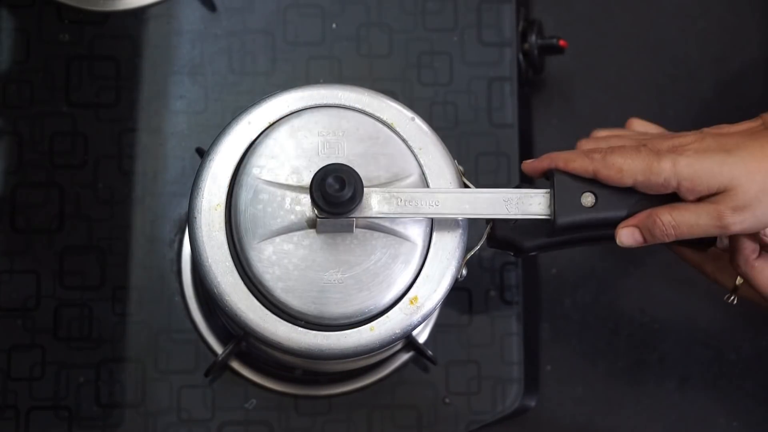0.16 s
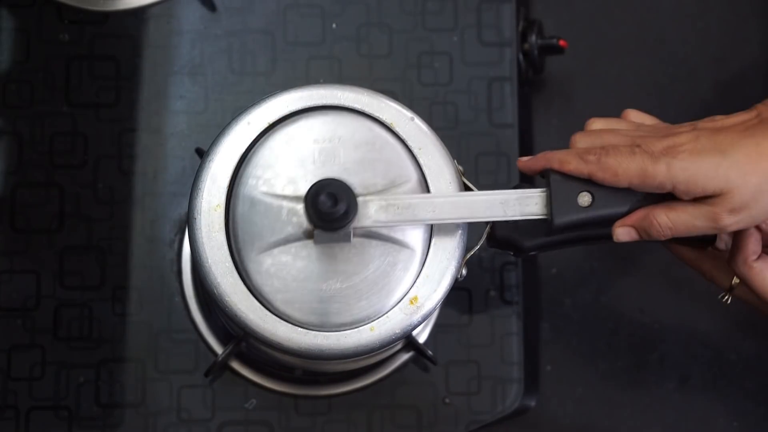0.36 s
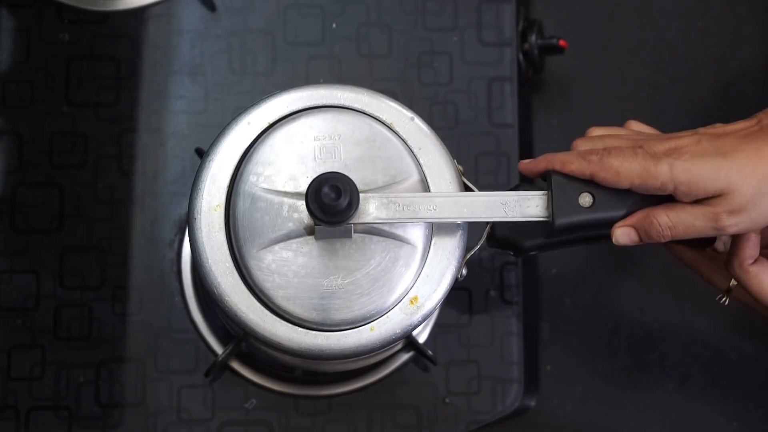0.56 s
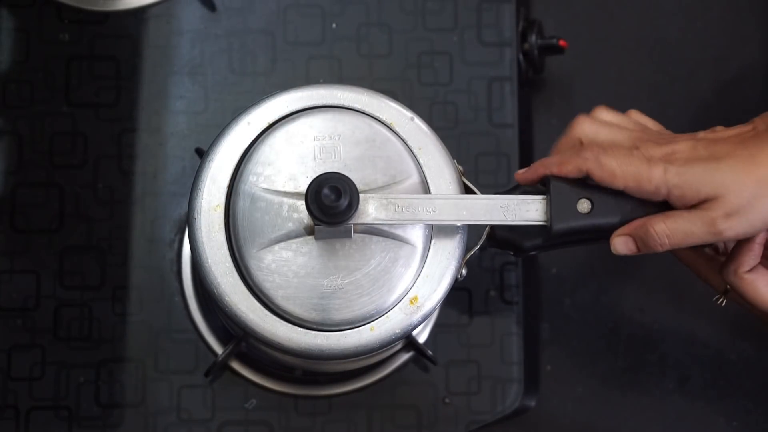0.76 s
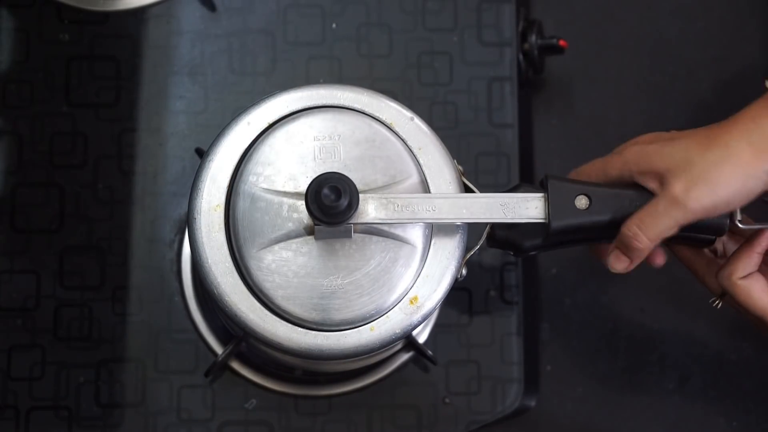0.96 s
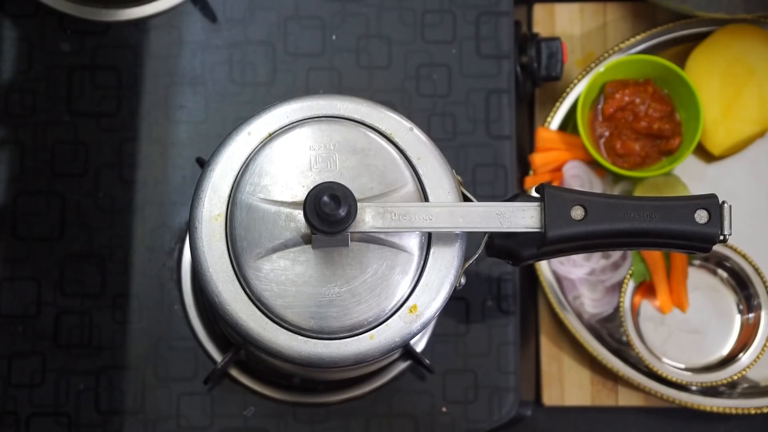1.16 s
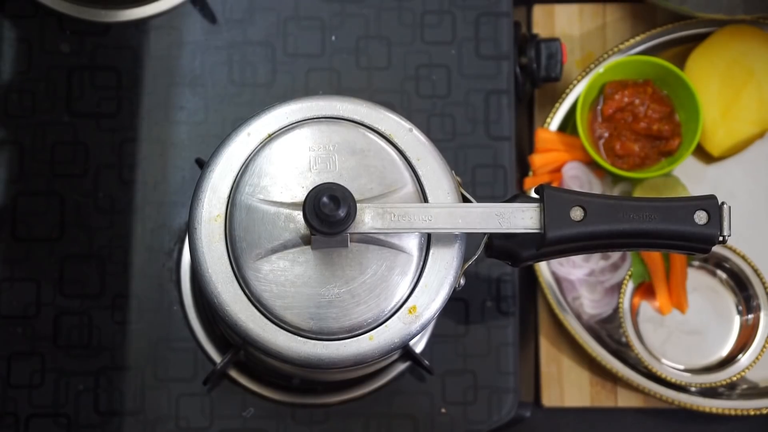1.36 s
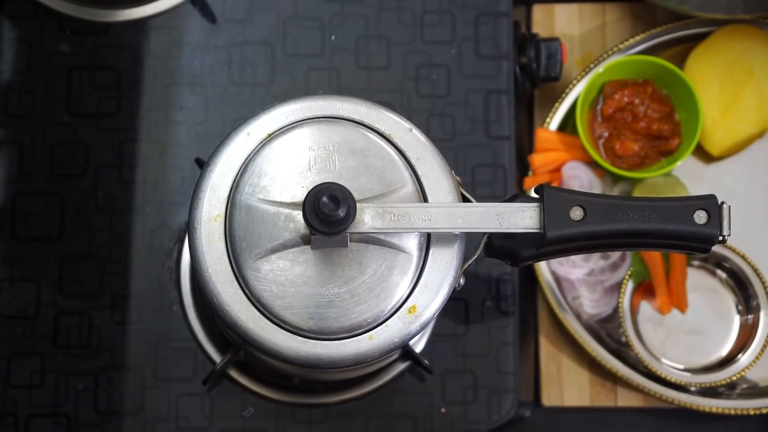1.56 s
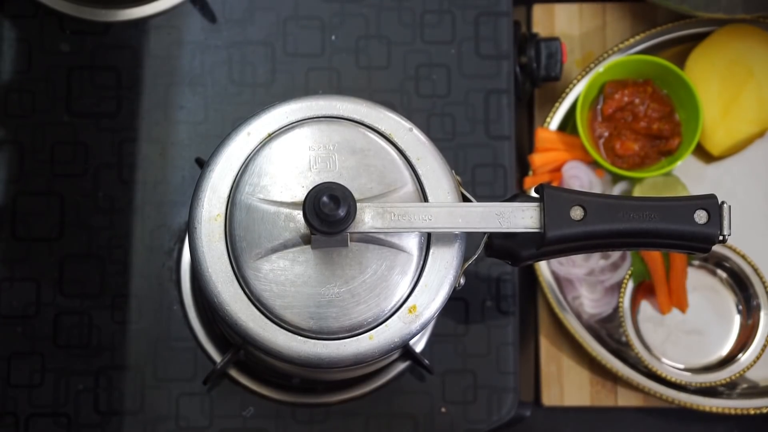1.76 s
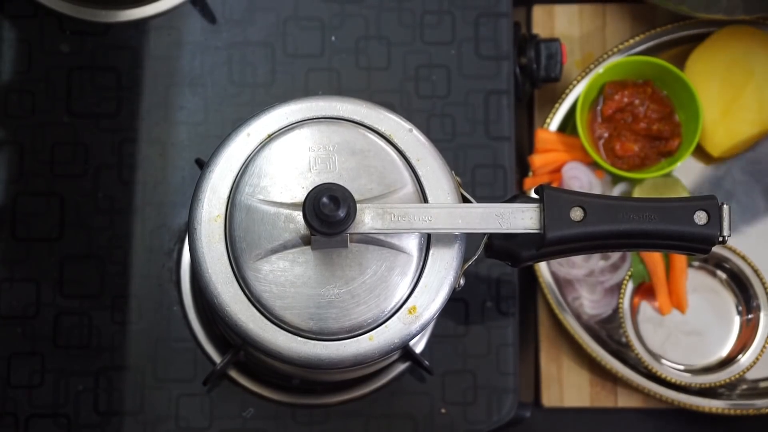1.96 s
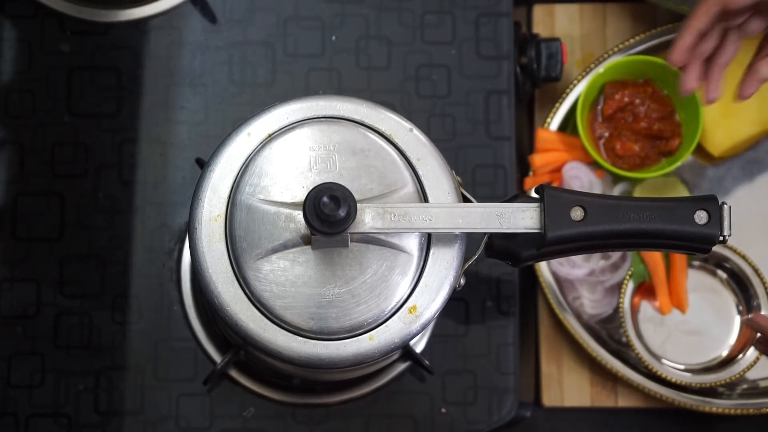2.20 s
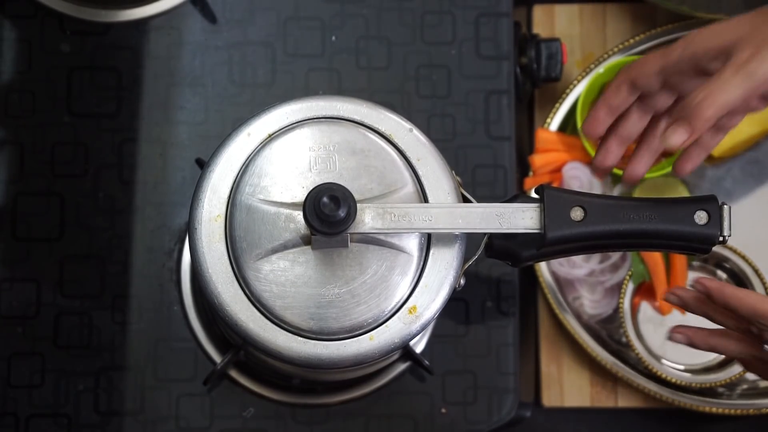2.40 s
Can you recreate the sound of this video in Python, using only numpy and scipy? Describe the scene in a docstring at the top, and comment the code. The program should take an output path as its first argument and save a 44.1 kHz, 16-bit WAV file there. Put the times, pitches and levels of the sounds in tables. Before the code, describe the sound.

A metal pressure cooker lid knocks and scrapes into place, its catch snaps with a bright ring and rattles, then sound cuts abruptly to quiet kitchen hiss and faint dish clinks; close stereo pickup, reflective room.

```python
"""In a hard-walled kitchen, the lid of a metal pressure cooker is seated and locked.
Short pushes filtered by the metal make lid bumps; added noisy slides make rim scrapes and catch snaps.
Decaying sine waves make pot, rim and catch ring. During a last rattle all sound is cut off abruptly.
Then the kitchen fades back in: filtered noise for hiss and rumble, sine waves for hum, and faint dish clinks.
"""
import sys
import numpy as np
from scipy import signal
from scipy.fft import rfft, irfft, next_fast_len
from scipy.io import wavfile

SR = 44100
rng = np.random.default_rng(int(sys.argv[2]) if len(sys.argv) > 2 else 0)


def wav_record(signal):
    """Record a signal, one row per channel, as 16-bit PCM in the file named by sys.argv[1]."""
    frames = np.transpose(np.atleast_2d(signal))
    bounded = np.clip(frames, -1, 1)
    # unit amplitude maps onto the largest positive 16-bit level
    quanta = np.round(bounded * 32767).astype(np.int16)
    wavfile.write(sys.argv[1], SR, quanta)


N = 107339
TIME = np.arange(N) / SR  # seconds

# Event levels are set at the source, before filters, room and fades.
# Colours and ringing notes have levels relative to the others in their own table.

# Colour of the soft background hiss: (frequency [Hz], relative level [dB])
HISS_COLOUR = [(25, -11.5), (60, -6), (125, -7), (170, -0.5), (240, -2), (330, -3), (450, -2), (750, -4),
               (1100, -5), (1500, -7.5), (2200, -14), (3200, -17.5), (4500, -23), (6500, -29.5),
               (9000, -31), (12000, -35.5), (16000, -37)]
# Steady hum of a motor:
# (frequency [Hz], level before the sound cuts off [dB], level after it fades back in [dB])
MOTOR_HUM = [(44.8, -65, -67), (70.7, -54, -59), (97.26, -43, -47.5), (251, -57.5, -56), (355, -63, -59.5),
             (842, -56, -57.5)]
# Changing loudness of the low rumble: (time [s], level [dB])
RUMBLE_LEVEL = [(0, -54), (1.45, -76.5), (1.62, -48), (1.72, -47), (1.82, -66), (2.0, -51), (2.12, -48.5),
                (2.25, -52), (2.43, -61)]
# Faint clinks of dishes: (time [s], level [dB], pitch [Hz])
DISH_CLINKS = [(1.372, -19, 4200), (1.494, -21, 4400)]

# How long the room's echo takes to fall by 60 dB: (frequency [Hz], time [s])
ROOM_DECAY = [(100, 0.28), (400, 0.64), (1500, 0.8), (4500, 0.69), (8000, 0.58), (15000, .42)]
# Strength of the room's echo compared with the direct sound: (frequency [Hz], level [dB])
ROOM_ECHO = [(100, -6), (300, 4), (1000, 7), (3000, 7), (12000, 8)]
# How alike left and right are in hiss and echo: (frequency [Hz], likeness [-1 to 1])
LEFT_RIGHT_LIKENESS = [(60, 0.89), (180, 0.95), (350, 0.86), (700, 0.74), (1400, 0.55), (2800, 0.42),
                       (5600, 0.033), (14000, 0.047)]

# The lid bumps on its gasket: (time [s], level [dB], brightness limit [Hz])
LID_BUMPS = [(.006, 1, 2200), (.117, 7.5, 603), (0.1317, 9, 497), (0.1483, -5, 396), (0.379, -1, 1550),
             (.389, 7, 1800), (0.3966, 14.5, 1940), (0.406, -1.5, 720), (0.446, -1, 1470), (.588, 12, 398),
             (0.5996, 1.5, 2530), (0.655, -8.5, 444), (0.73, -1, 610), (0.762, -9, 397), (0.804, -8, 3000),
             (.915, -2.5, 450)]
# The rim strikes the pot and slides on: (time [s], level [dB], slide decay [s], brightness limit [Hz])
RIM_STRIKES = [(.005, 9.5, 0.028, 4480), (.018, 5, 0.018, 6250), (.0245, 13, 0.0066, 9000),
               (.056, 6.5, 0.012, 7700), (.1265, 7.5, 0.002, 9300), (.1615, -6.5, 0.0038, 8330),
               (.4108, 10.5, 0.0082, 4300), (.426, 12, 0.0083, 10200), (.433, 12, 0.0097, 10400),
               (.4395, 8.5, 0.019, 11400), (.466, 8.5, 0.018, 8100), (.5995, 9, 0.0057, 6500),
               (.6454, -7, 0.0018, 7120)]
# The wire catch rubs, snaps home and settles:
# (time [s], level [dB], slide decay [s], brightness limit [Hz])
CATCH_SNAPS = [(.806, 4.5, 0.0027, 1900), (.8165, 13.5, 0.0019, 13400), (.8195, 11.5, 0.0031, 4460),
               (.835, 7, 0.031, 9040), (.9707, -1.5, 0.0024, 15320)]
# The loose catch rattles on the handle: (time [s], level [dB], slide decay [s], brightness limit [Hz])
CATCH_RATTLES = [(1.1778, -3.5, 0.0036, 8100), (1.188, 1.5, 0.0043, 15400), (1.197, -6.5, 0.0096, 14000)]
# Dry, hard edges of the sharpest contacts:
# (time [s], level [dB], decay [s], lowest frequency [Hz], highest frequency [Hz])
SHARP_CRACKS = [(0.598, -3.5, 0.0032, 1220, 2130), (0.812, -9, 0.00088, 2960, 13750),
                (1.189, -9.5, 0.0027, 697, 15100)]

# Colour of the lid dragging on rubber: (frequency [Hz], relative level [dB])
RUBBER_COLOUR = [(40, -44), (120, -27.5), (270, -11), (340, -11), (460, -4), (620, -7.5), (850, -17),
                 (1450, -7.5), (2000, -20.5), (4000, -16)]
# Colour of the cushioned bumps in the pot: (frequency [Hz], relative level [dB])
BUMP_BODY_COLOUR = [(30, -40.5), (120, -17), (180, -6), (230, 2), (280, 0), (380, -7), (700, -13),
                    (960, -8.5), (1130, -14.5), (1400, -1.5), (1750, -9.5), (2200, -19.5), (5000, -8.5),
                    (12000, -55)]
# Colour of the rim against the pot: (frequency [Hz], relative level [dB])
RIM_BODY_COLOUR = [(50, -29.5), (400, -2), (1000, -4.5), (1450, -1.5), (1900, -11.5), (2200, -4.5),
                   (2700, -0.5), (3400, -5.5), (4400, -0.5), (4900, 6.5), (5400, 5), (6100, -8.5),
                   (7000, -0.5), (7550, 2), (8400, -7.5), (12000, -10.5), (16000, -18.5)]
# Colour of the wire catch: (frequency [Hz], relative level [dB])
CATCH_BODY_COLOUR = [(50, -45.5), (250, -13.5), (500, -11), (800, -10.5), (1050, -15.5), (1400, -4),
                     (1750, -19), (2050, -3.5), (2450, 3), (2750, 6), (3050, -2), (3450, -12), (4400, -5),
                     (5400, -6), (7500, -12.5), (10000, -15), (14000, -18), (16000, -37.5)]
# Colour of the rattling catch: (frequency [Hz], relative level [dB])
RATTLE_BODY_COLOUR = [(100, -5), (700, -6.5), (1500, -9.5), (3600, -9.5), (5100, -0.5), (6800, -12),
                      (11000, -6.5), (16000, -10.5)]

# Ringing notes of the pot: (frequency [Hz], relative level [dB], time to fall by 60 dB [s])
POT_NOTES = [(171.2, -8, 0.46), (241.8, -5.5, 0.97), (284.6, -4, 0.32), (375, -8.5, 0.72),
             (427, -3.5, 0.73), (461, -15, 0.44), (596, -13, 0.76), (1086, -9.5, 0.81), (1371, -17, 0.55),
             (1507, -13, 0.31)]
# Ringing notes of the rim: (frequency [Hz], relative level [dB], time to fall by 60 dB [s])
RIM_NOTES = [(1920, -20, 0.55), (2616, -2.5, 0.47), (4107, -8, .5), (4468, -14, 0.6), (4500, 11, 0.36),
             (4930, 2.5, 0.45), (5130, -12, 0.42), (5070, -4.5, 0.76), (5440, -5, 0.39), (5300, 6.5, 0.54),
             (5500, -18.5, 0.41), (7340, 1, 0.15)]
# Ringing notes of the catch: (frequency [Hz], relative level [dB], time to fall by 60 dB [s])
CATCH_NOTES = [(1450, -24, 0.96), (2200, 5, 0.58), (2200, 12, .6), (2550, -12, 0.86), (2640, -8, 1),
               (2700, -11, 0.85), (2930, -4, 0.4), (2840, -9, 0.65), (5200, 19.5, 0.616)]

HISS_BEFORE_DB, HISS_AFTER_DB = -41.5, -43
CUT_S, CUT_DECAY_S = 1.2065, .0025  # all sound is cut off abruptly
FADE_START_S, FADE_S, FADE_POWER = 1.202, 0.21, 1.65  # the kitchen fades back in
EARLY_DB, EARLY_DECAY_S, FIRST_ECHO_S = -6, .008, 0.0013
DRAG_S, DRAG_DECAY_S, DRAG_DB = .002, 0.035, 19
SLIPS_PER_S, SLIDE_SHARE = 4300, 0.82  # slide's share of the energy; the click has the rest
POT_RING_DB, RIM_RING_DB, CATCH_RING_DB = -5.5, -8.5, -9
RING_DIFFUSE_HZ = 2980  # the left-right phase spread of ringing is full from here up
BEND_DELAY_S, BEND_REF_HZ = 0.001106, 981  # travel time in the metal at this frequency
PAN_DB = .45  # left is raised and right lowered by this much
CUTOFF_HZ = 15800


def from_db(db):
    """Turn decibels into a gain."""
    return 10 ** (np.asarray(db) / 20)


def unit(x):
    """Scale a sound to an energy of one."""
    return x / np.sqrt(np.sum(x ** 2) + 1e-20)


def at_hz(points, hz):
    """Read a table between its points, on a logarithmic frequency axis."""
    table_hz, values = np.transpose(points)
    return np.interp(np.log(np.maximum(hz, 1)), np.log(table_hz), values)


def through(x, response):
    """Let a sound or force set off a response at every sample."""
    return signal.fftconvolve(x, response)[:N]


def knock(colour, size=2048):
    """A body's short response to one push, with its energy as early as the colour allows."""
    gain = from_db(at_hz(colour, np.fft.rfftfreq(size, 1 / SR)))
    cepstrum = irfft(np.log(gain))
    # Folding the second half onto the first makes the response start at once.
    cepstrum[1:size // 2] *= 2
    cepstrum[size // 2 + 1:] = 0
    return unit(irfft(np.exp(rfft(cepstrum))))


def add(track, time_s, db, force, bright_hz):
    """Lay a force on a track; a lower brightness limit softens its treble."""
    soften = signal.butter(2, bright_hz, fs=SR, output="sos")
    force = signal.sosfilt(soften, force + 1e-18)
    start = int(time_s * SR)
    track[start:start + len(force)] += from_db(db) * force[:N - start]


def stereo_bands(count=20):
    """White stereo noise in overlapping bands, with left and right most alike in the bass."""
    size = next_fast_len(N)
    hz = np.fft.rfftfreq(size, 1 / SR)
    centres = np.geomspace(40, 16000, count)
    mid, side = rfft(rng.standard_normal((2, size)))
    alike = at_hz(LEFT_RIGHT_LIKENESS, hz)
    shared = np.sqrt((1 + alike) / 2) * mid
    opposed = np.sqrt((1 - alike) / 2) * side * [[1], [-1]]
    bands = []
    for centre, weights in zip(centres, np.eye(count)):
        band_gain = at_hz(np.c_[centres, weights], hz)
        band = irfft((shared + opposed) * band_gain, size)[:, :N]
        bands.append((centre, band))
    return bands


def background():
    """Filtered noise makes hiss and rumble; sine waves make a motor's hum."""
    after = TIME > CUT_S
    noise = sum(band for _, band in stereo_bands())
    hiss_response = knock(HISS_COLOUR, size=8192)
    hiss = np.array([through(side, hiss_response) for side in noise])
    hiss = hiss * from_db(np.where(after, HISS_AFTER_DB, HISS_BEFORE_DB))
    hum = np.zeros(N)
    for hz, before_db, after_db in MOTOR_HUM:
        level = np.sqrt(2) * from_db(np.where(after, after_db, before_db))
        hum += level * np.sin(2 * np.pi * (hz * TIME + rng.random()))
    low_band = signal.butter(2, [42, 62], "band", fs=SR, output="sos")
    low = signal.sosfilt(low_band, rng.standard_normal(N))
    rumble_db = np.interp(TIME, *np.transpose(RUMBLE_LEVEL))
    rumble = unit(low) * np.sqrt(N) * from_db(rumble_db)
    return hiss + hum + rumble


def dishes(decay_s=0.00098):
    """Each dish clink is a sine wave that dies away very quickly."""
    track, t = np.zeros(N), TIME[:SR // 20]
    for time_s, db, hz in DISH_CLINKS:
        clink = np.sin(2 * np.pi * hz * t) * np.exp(-t / decay_s)
        add(track, time_s, db, unit(clink), bright_hz=11900)
    return track


def kitchen(x):
    """Hob and walls reflect the sound as strong early echoes and a tail that dies band by band."""
    t, tail, direct = TIME[:SR], 0, []
    for hz, band in stereo_bands():
        decay = from_db(-60 * t / at_hz(ROOM_DECAY, hz))
        early = 1 + from_db(EARLY_DB) * np.exp(-t / EARLY_DECAY_S)
        shape = unit(decay * early * (t > FIRST_ECHO_S))
        echo = from_db(at_hz(ROOM_ECHO, hz))
        total = np.hypot(1, echo)  # direct and echoed energy together stay at one
        tail = tail + band[:, :SR] * shape * echo / total
        direct.append((hz, 1 / total))
    direct_gain = at_hz(direct, np.fft.rfftfreq(2 * N, 1 / SR))
    near = irfft(rfft(x, 2 * N) * direct_gain)[:N]
    return near + np.array([through(x, side) for side in tail])


def bend(x):
    """Bending waves in sheet metal spread each knock: low notes arrive later than high ones."""
    hz = np.fft.rfftfreq(2 * N, 1 / SR)
    turns = 2 * BEND_DELAY_S * np.sqrt(BEND_REF_HZ * hz)
    return irfft(rfft(x, 2 * N) * np.exp(-2j * np.pi * turns))[:N]


def ring(force, notes, level_db):
    """A force sets metal ringing in decaying sine waves, whose phases differ more in the treble."""
    t, response = TIME[:SR], 0
    for hz, db, t60 in notes:
        spread = np.pi / 2 * min(hz / RING_DIFFUSE_HZ, 1)
        phase = rng.uniform(-1, 1) * spread * np.array([[1], [-1]])
        decay = from_db(db - 60 * t / t60) / np.sqrt(t60)  # long notes start lower
        response = response + decay * np.sin(2 * np.pi * hz * t + phase)
    response = np.sqrt(2) * unit(response)
    return from_db(level_db) * np.array([through(force, side) for side in response])


def slide(decay_s, size=16384):
    """A slide is a dying run of tiny random slips, evened out so that it has no pitch of its own."""
    decay = np.exp(-TIME[:size] / decay_s)
    happens = rng.random(size) < SLIPS_PER_S / SR
    slips = happens * rng.standard_normal(size) * decay
    spectrum = rfft(slips)
    even = irfft(spectrum / (np.abs(spectrum) + 1e-9))
    return unit(even * np.sqrt(decay))


def contacts(rows):
    """Metal meets metal with a click, then a short slide."""
    track = np.zeros(N)
    for time_s, db, decay_s, bright_hz in rows:
        force = np.sqrt(SLIDE_SHARE) * slide(decay_s)
        force[0] += np.sqrt(1 - SLIDE_SHARE)
        add(track, time_s, db, unit(force), bright_hz)
    return track


def cracks():
    """The sharpest contacts add brief bursts of filtered noise, without echo."""
    track, t = np.zeros(N), TIME[:SR // 50]
    for time_s, db, decay_s, low_hz, high_hz in SHARP_CRACKS:
        burst = rng.standard_normal(len(t)) * np.exp(-t / decay_s)
        band = signal.butter(2, [low_hz, high_hz], "band", fs=SR, output="sos")
        add(track, time_s, db, unit(signal.sosfilt(band, burst)), bright_hz=15000)
    return track


def catch():
    """The wire catch snaps and rings, then rattles without ringing: (knocks, ringing)."""
    force = contacts(CATCH_SNAPS)
    snaps = through(force, knock(CATCH_BODY_COLOUR))
    rattles = through(contacts(CATCH_RATTLES), knock(RATTLE_BODY_COLOUR))
    return snaps + rattles, ring(force, CATCH_NOTES, CATCH_RING_DB)


def rim():
    """The rim strikes and scrapes the pot, which makes it ring: (knocks, ringing)."""
    force = contacts(RIM_STRIKES)
    return through(force, knock(RIM_BODY_COLOUR)), ring(force, RIM_NOTES, RIM_RING_DB)


def gasket():
    """Cushioned bumps boom in the pot, and the lid drags on the rubber: (knocks, ringing)."""
    bumps, drag = np.zeros(N), np.zeros(N)
    for time_s, db, bright_hz in LID_BUMPS:
        add(bumps, time_s, db, signal.unit_impulse(SR // 20), bright_hz)
    add(drag, DRAG_S, DRAG_DB, slide(DRAG_DECAY_S), bright_hz=6000)
    knocks = through(bumps, knock(BUMP_BODY_COLOUR)) + through(drag, knock(RUBBER_COLOUR))
    return knocks, ring(bumps, POT_NOTES, POT_RING_DB)


def scene():
    """The cooker is shut, then all sound cuts off; the quiet kitchen and faint dishes fade in."""
    knocks, ringing = (sum(parts) for parts in zip(gasket(), rim(), catch()))
    cooker = kitchen(bend(knocks)) + ringing + cracks()
    cooker = cooker * from_db([[PAN_DB], [-PAN_DB]])
    cut = np.exp(-np.maximum(TIME - CUT_S, 0) / CUT_DECAY_S)
    fade_in = np.clip((TIME - FADE_START_S) / FADE_S, 0, 1) ** FADE_POWER
    return cut * cooker + fade_in * kitchen(dishes()) + (cut + fade_in) * background()


def record(dry):
    """Cut the highest treble steeply."""
    low_pass = signal.ellip(10, .2, 90, CUTOFF_HZ, fs=SR, output="sos")
    return signal.sosfilt(low_pass, dry)


dry = scene()
out = record(dry)
wav_record(out)
```